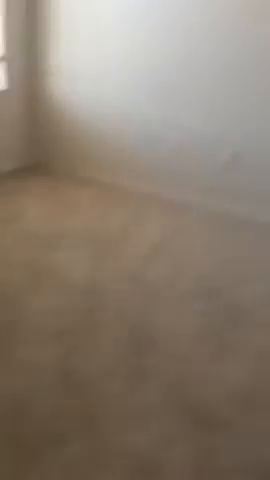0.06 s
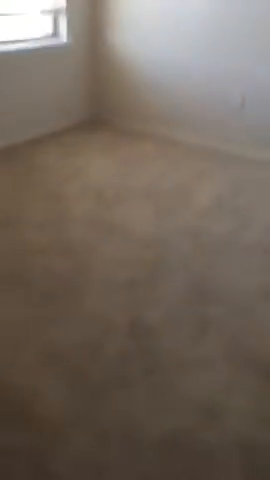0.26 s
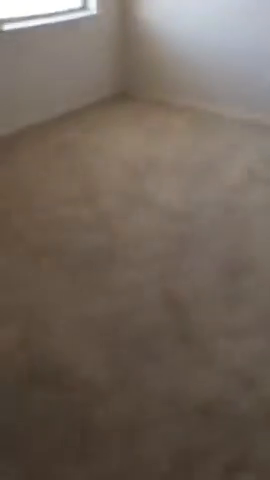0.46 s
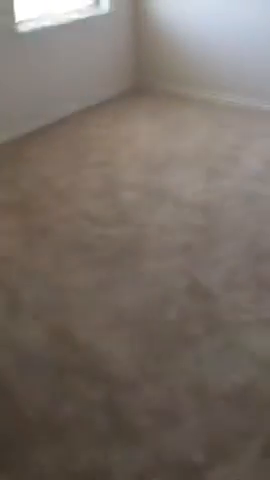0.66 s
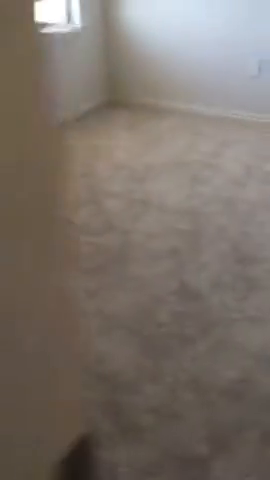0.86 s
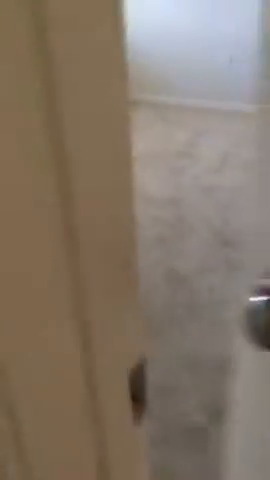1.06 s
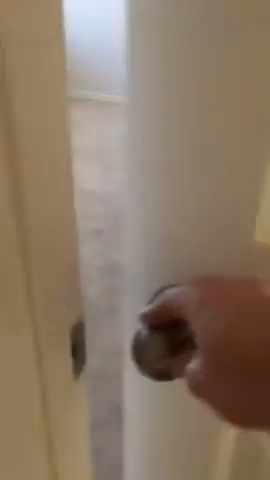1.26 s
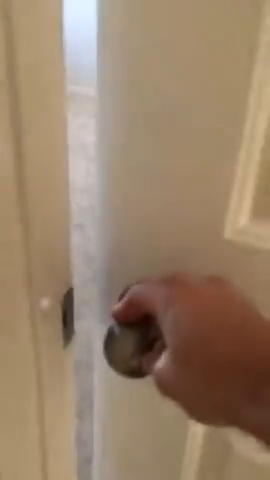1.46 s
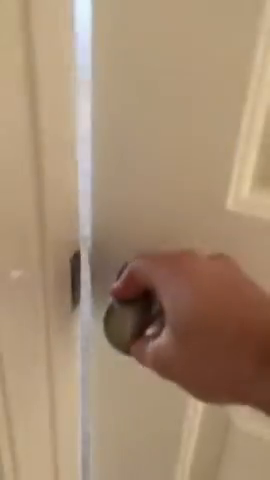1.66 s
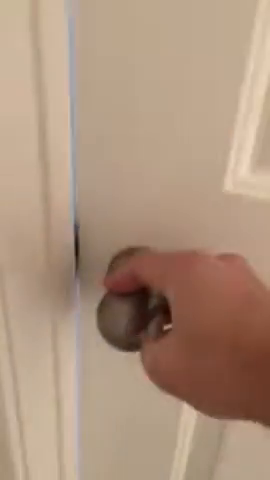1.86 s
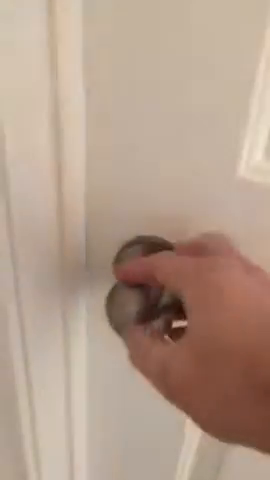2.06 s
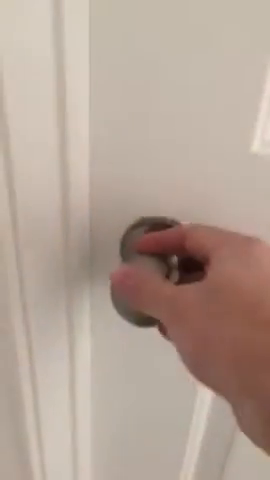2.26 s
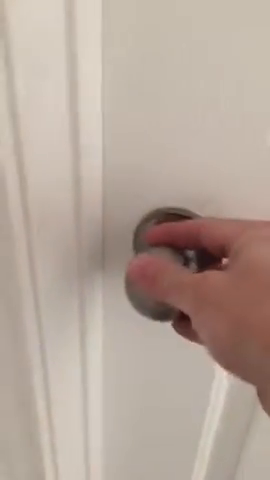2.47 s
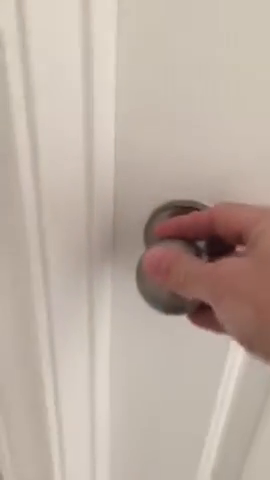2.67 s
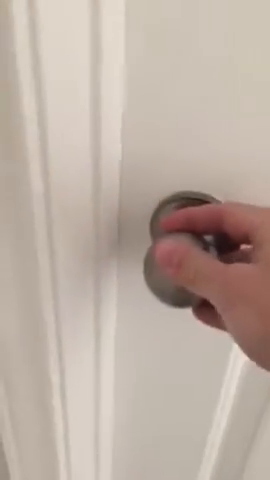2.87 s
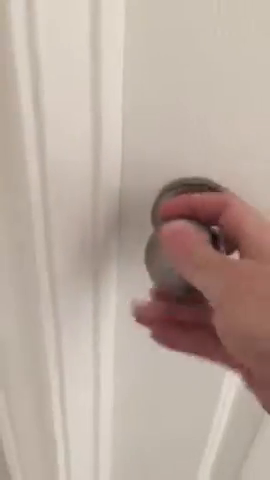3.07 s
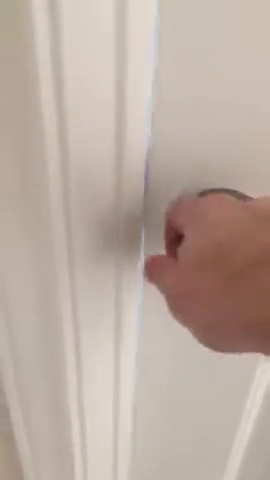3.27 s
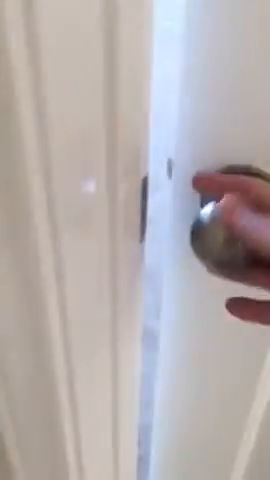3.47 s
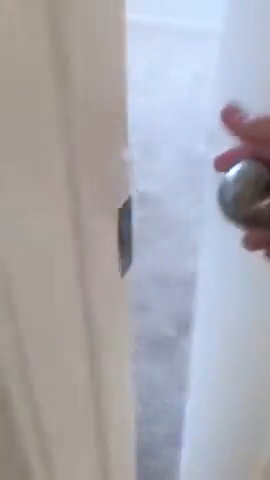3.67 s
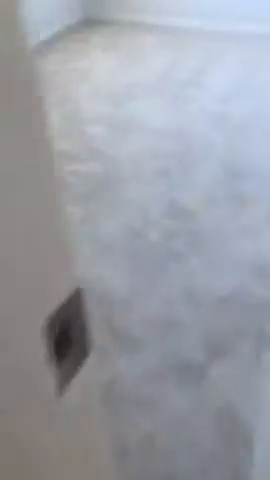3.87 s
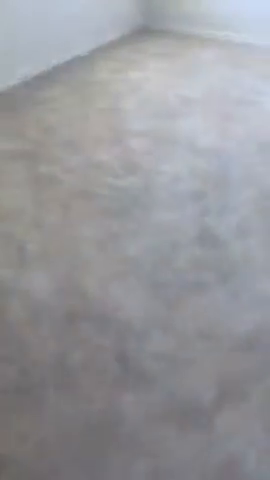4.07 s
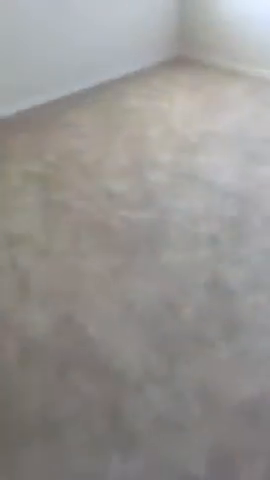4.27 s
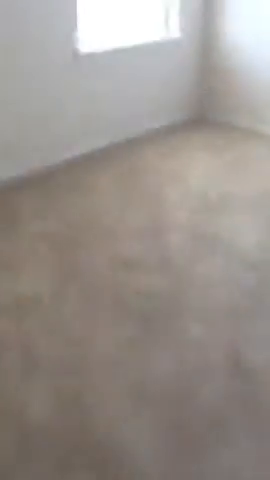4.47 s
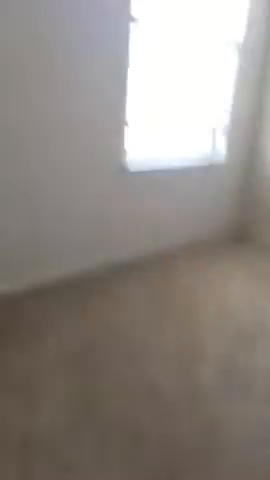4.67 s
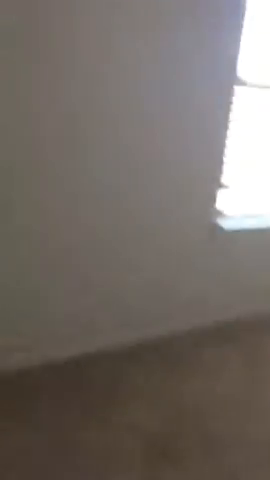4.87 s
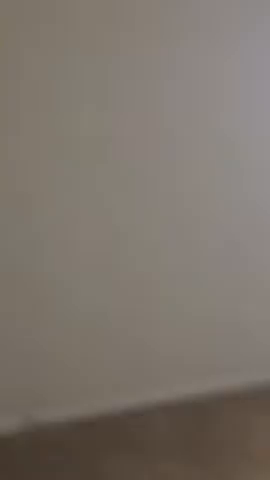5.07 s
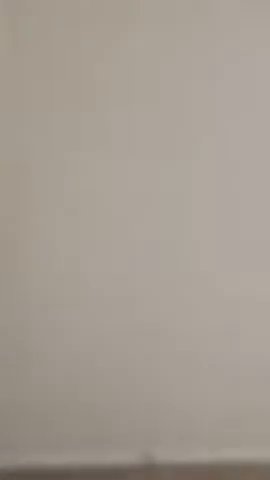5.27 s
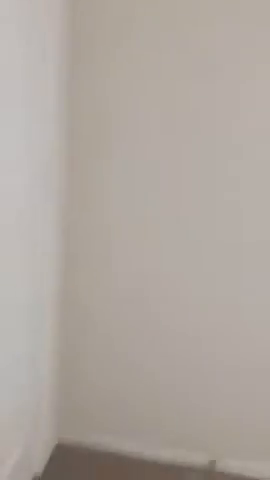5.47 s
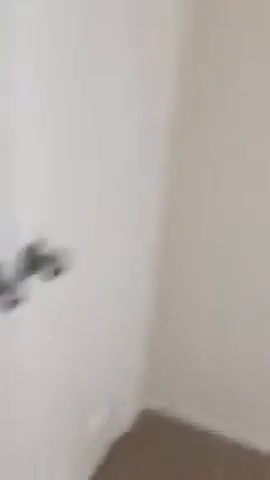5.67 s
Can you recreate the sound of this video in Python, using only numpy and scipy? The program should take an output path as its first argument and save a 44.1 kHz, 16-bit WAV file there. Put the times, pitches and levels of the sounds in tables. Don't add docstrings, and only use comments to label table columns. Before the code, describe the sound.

In an empty echoing room, a light door slams shut over carpet, the loose knob clatters, and the latch clicks free amid soft footsteps.

```python
import sys
import numpy as np
from scipy import signal
from scipy.fft import rfft, irfft
from scipy.io import wavfile
from scipy.ndimage import uniform_filter1d

SR = 44100
rng = np.random.default_rng(int(sys.argv[2]) if len(sys.argv) > 2 else 0)


def wav_out(sig):
    wavfile.write(sys.argv[1], SR, np.round(np.clip(np.atleast_2d(sig).T, -1, 1) * 32767).astype(np.int16))


def invert_db(x):
    u = np.asarray(x, float) / 20
    return 10 ** u


N = 252252
T = np.arange(N) / SR

# (pitch [Hz], level [dB])
LATCH = [(1450, -4.5), (1780, -2), (2000, -1), (2400, -2), (2750, -5.5), (3100, -7), (3700, -3.5),
         (3900, -5), (4500, -10)]
# (pitch [Hz], level [dB], time to fade 60 dB [s])
DOOR = [(62, 0, 0.34), (86, -6, 0.17), (104.6, -4.5, .4), (133, -11, 0.11), (168, 4.5, .3),
        (211.3, -0.5, 0.47), (283.3, 4, 0.26), (338, -1.5, 0.27), (367, -4.5, 0.39), (426, -9, 0.56),
        (488.5, -5, 0.19)]
# (pitch [Hz], level [dB], time to fade 60 dB [s])
SKIN = [(562, -3, 0.25), (616, 0.5, 0.26), (652.6, -6, 0.27), (700.2, -2, 0.21), (799.7, 2.5, 0.16),
        (835, -1, 0.16), (887, 0, 0.22), (986, 1, .1), (1089, -2.5, 0.29), (1244, 0, 0.099),
        (1295, -7, 0.09), (1450, -19.5, 0.16), (1660, -19, 0.11), (1870, -14.5, 0.11)]


def colour(x, points):
    hz, db = np.transpose(points)
    f = np.maximum(np.arange(len(x) // 2 + 1) * SR / len(x), 1)
    gain_db = np.interp(np.log(f), np.log(hz), db)
    return irfft(rfft(x) * invert_db(gain_db), len(x))


def unit(x):
    return x / np.sqrt(np.mean(x ** 2))


def ring(hz, db, t60, seconds, sign=1):
    t = T[:int(seconds * SR), None]
    fade = 1000. ** (-t / np.maximum(t60, .002))
    return np.sum(sign * invert_db(db) * np.sin(2 * np.pi * hz * t) * fade, axis=1)


def add(out, s, x, db):
    i = int(s * SR)
    out[i:i + len(x)] += (x * invert_db(db) / np.abs(x).max())[:N - i]


def track(spans, column, edge=.012):
    value, gate = np.zeros(N), np.zeros(N)
    for rows in map(np.array, spans):
        first_s, last_s = rows[0, 0], rows[-1, 0]
        near = (T > first_s - edge) & (T < last_s + edge)
        value[near] = np.interp(T[near], rows[:, 0], rows[:, column])
        gate[(T > first_s) & (T < last_s)] = 1
    return value, uniform_filter1d(gate, int(edge * SR))


def walk(rate):
    k = int(SR / rate)
    held = np.repeat(rng.standard_normal(N // k + 1), k)
    return uniform_filter1d(held, k)[:N]


def each(groups):
    return [(*row, *traits) for rows, *traits in groups for row in rows]


def swell(s, db, build_s, fade_s, roundness):
    away = np.where(T < s, (s - T) / max(build_s, .001), (T - s) / max(fade_s, .001))
    return invert_db(db - 30 * np.minimum(away, 4) ** roundness)


def slips(per_second, scatter_db, hiss):
    clicks = (rng.random(N) < per_second / SR) * invert_db(scatter_db * rng.exponential(size=N))
    clicks = clicks * rng.choice([-1, 1], N)
    return clicks + hiss * rng.standard_normal(N) * np.std(clicks)


def through(x, modes, t60):
    sides = (-1) ** np.arange(len(modes))
    hz, db = np.transpose(modes)
    return unit(signal.fftconvolve(x, ring(hz, db, t60, .12, sides))[:N])


def house():
    # (pitch [Hz], level [dB per Hz])
    hiss_tone = [(15, -58), (25, -9), (43, 0.5), (166, -1), (195, -2), (223, -2.5), (277, -7), (591, -12),
                 (818, -14), (2110, -14.5), (16000, -28.5)]
    # (time [s], pitch [Hz], level [dB], level of the tone an octave up [dB])
    hum = [(0.4, 105.2, -66, -67.5), (1.062, 106.7, -68.5, -69), (1.66, 111.9, -73, -64),
           (1.7, 103, -57, -95), (1.88, 109, -77, -105)]
    hz, gate = track([hum], 1, edge=0.085)
    db, _ = track([hum], 2, edge=0.085)
    second_db, _ = track([hum], 3, edge=0.085)
    phase = 2 * np.pi * np.cumsum(hz) / SR
    motor = invert_db(db + 1.0 * walk(4)) * np.sin(phase)
    motor = motor + invert_db(second_db + 1.5 * walk(8)) * np.sin(2 * phase)
    air = unit(colour(rng.standard_normal(N), hiss_tone)) * invert_db(-66.5 + .9 * walk(2.5))
    return air + np.sqrt(2) * gate * motor


def ticks():
    # (time [s], peak level [dB], pitch [Hz])
    bolt_tip = [(0.0972, -48.5, 1290), (1.9247, -8, 2940), (3.2086, -45.5, 1400), (3.4441, -52, 2100),
                (3.4683, -49, 3870), (3.2947, -12, 3770)]
    bolt_side = [(2.0742, -22, 1991), (2.0934, 1, 3800), (2.1874, -28, 2240), (2.755, -47, 1450),
                 (3.2505, -37, 1326), (3.281, -19, 2100), (3.5822, -22, 1380), (3.5638, -18, 2100)]
    spring = [(0.1321, -45, 2680), (2.7472, -33, 2500)]
    catch = [(1.3, -25, 1940), (3.0286, -30.5, 1670), (3.1005, -39, 1300), (3, -51, 1794)]
    knob = [(0.0468, -47.5, 1660), (0.7652, -55, 1530), (0.9652, -49, 1650), (1.6906, -50.5, 1300),
            (2.613, -34, 1800), (2.9033, -42.5, 1870), (3.263, -33.5, 1500), (2.9183, -30.5, 2250),
            (2.9991, -43.5, 2260), (3.3444, -27, 2370), (3.4871, -34, 2100), (3.9769, -41.5, 1740),
            (4.0098, -40, 2900), (3.228, -51, 1930), (3.273, -33.5, 1230), (3.59, -25, 1353),
            (3.598, -35.5, 1370)]
    collar = [(0.3436, -48.5, 2620), (2.0857, -9, 1900), (2.1556, -14.5, 2268), (2.2443, -32.5, 1350),
              (2.401, -35, 2500), (2.7202, -40, 2290), (2.7379, -25, 1870), (2.7944, -59, 1430),
              (2.6584, -30, 2060), (2.8799, -52, 1600), (3.5404, -47, 2030)]
    # (pitch [Hz], level [dB])
    bright = [(5650, -2), (6300, 7), (6900, -3), (7700, -7), (9200, -6.5), (10000, -8), (11800, 0),
              (14500, -3), (15600, 2)]
    # (contacts, treble [dB], time to fade 60 dB [s])
    parts = [(bolt_tip, -4, .009), (bolt_side, -8, .01), (spring, -8, .035),
             (catch, -17, .016), (knob, -21, .045), (collar, -27, .028)]
    out, (hz, db) = np.zeros(N), np.transpose(LATCH)
    top_hz, top_db = np.transpose(bright)
    t = T[:2000]
    for s, peak_db, centre_hz, treble_db, t60 in each(parts):
        chance = rng.standard_normal((6, len(hz)))
        near_db = -14 * np.abs(np.log2(hz / centre_hz))
        body_hz, body_db = hz * (1 + 0.047 * chance[0]), db + near_db + 3 * chance[1]
        body = ring(body_hz, body_db, t60, .1, np.sign(chance[5]))
        body = body + ring(centre_hz, -1.0, .8 * t60, .1)
        tilt_db = (0.24 * treble_db - 8.5) * np.log2(top_hz / top_hz[0])
        bright_hz, bright_db = top_hz * (1 + .02 * chance[2]), top_db + tilt_db + 2 * chance[3]
        top = ring(bright_hz, bright_db, .25 * t60, .1, np.sign(chance[4]))
        shudder = np.exp(-t / 0.0045) + .27 * np.exp(-t / (0.8 * t60))
        grit = colour(rng.standard_normal(2000), [(400, -34.0), (1200, 5.0), (3500, -3.5), (6000, treble_db),
                                                  (16000, 1.1 * treble_db - 9.0)])
        add(out, s, body, peak_db)
        add(out, s, top, peak_db + treble_db)
        add(out, s, grit * shudder, peak_db - 6.0)
    return out


def knocks():
    # (time [s], peak level [dB], contact time [ms])
    grab = [(0.047, -47.5, 0.11), (0.0975, -24, 0.17), (0.103, -24.5, 0.46), (0.113, -22.5, 0.27),
            (0.128, -27, 0.24), (0.17, -32.5, 0.25), (0.15, -34, 0.19), (0.19, -31, 0.4), (0.21, -36, 0.19),
            (0.25, -36.5, 0.4), (0.28, -44.5, 0.32), (0.767, -60.5, 0.093), (0.966, -51.5, 0.058),
            (1.082, -50, 0.07), (1.117, -44.5, 0.11), (1.14, -48.5, 0.067), (1.315, -49.5, 0.088),
            (1.692, -48.5, 0.087), (1.71, -56, 0.12)]
    slam = [(1.9255, -13.5, 0.33), (2.086, 0.5, 0.48), (2.093, 1, 0.14), (2.103, -7.5, 0.67),
            (2.116, -6.5, 0.67)]
    rebound = [(2.157, -5.5, 0.043), (2.164, -17.5, 0.094), (2.184, -10.5, 0.051), (2.198, -20, 0.15),
               (2.213, -12.5, 0.41), (2.245, -16, 0.077), (2.272, -23.5, 0.088), (2.31, -21.5, 0.22),
               (2.33, -23.5, 0.34), (2.376, -26.5, 0.081), (2.411, -25, 0.24), (2.445, -27, 0.26),
               (3.031, -25, 0.48)]
    rattle = [(2.385, -27.5, 0.5), (2.614, -26, 0.15), (2.6595, -9.5, 0.3), (2.722, -17, 0.35),
              (2.751, -24.5, 0.64), (2.9395, -12, 0.32), (2.999, -15, 0.37), (3.012, -19.5, 0.66),
              (2.968, -24.5, 0.27), (2.738, -19, 0.55), (2.8, -26.5, 0.97), (3.1, -30, 0.37)]
    turn = [(2.915, -27, 0.23), (3.209, -25.5, 0.19), (3.264, -26, 0.26), (3.293, -32, 0.11),
            (3.343, -25, 0.23), (3.488, -27, 0.5), (3.561, -25.5, 0.56), (3.582, -29, 0.16),
            (3.594, -33.5, .2), (3.283, -34, 0.27), (3.383, -26, 0.6), (3.318, -35, .9), (3.978, -30, 0.33),
            (4.007, -25.5, 0.35), (4.045, -31.5, 0.45), (4.09, -38.5, .4)]
    far = [(4.935, -47.5, 0.5), (5.697, -43.5, 0.21), (5.708, -39, 0.146)]
    # (blows, share of the free ring [0-1], bass [dB], bass below [Hz])
    gestures = [(grab, 0.35, -17.5, 237), (slam, 0.41, -2, 190), (rebound, 0.37, 4.8, 150),
                (rattle, 0.42, 1.2, 89), (turn, 0.54, -24.5, 145), (far, 0.99, -23, 200)]
    out, (hz, db, t60) = np.zeros(N), np.transpose(DOOR + SKIN)
    sides = np.where(hz < 520, np.sign(hz - 118), (-1) ** np.arange(len(hz)))
    for s, peak_db, contact_ms, share, bass_db, bass_hz in each(gestures):
        chance = rng.standard_normal((2, len(hz)))
        bass = bass_db / (1 + (hz / bass_hz) ** 4)
        hz_now, db_now = hz * (1 + .008 * chance[0]), db + bass + 2.5 * chance[1]
        panel = ring(hz_now, db_now, t60 * share, 0.51, sides)
        push = T[:400] * np.exp(-T[:400] * 1000 / max(contact_ms, .03))
        add(out, s, signal.fftconvolve(panel, push), peak_db + 0.5)
    return out


def steps():
    # (time [s], peak level [dB], pitch [Hz], time to fade 60 dB [s])
    thuds_and_creaks = [(0.084, -39.5, 91, 0.12), (0.222, -33.5, 74, 0.12), (0.3, -40, 70, 0.056),
                        (0.365, -50, 87, 0.14), (1.078, -58, 595, .09), (1.098, -48, 630, 0.11),
                        (1.117, -54, 570, 0.13), (1.312, -59, 690, .1), (1.111, -45, 125.3, 0.19),
                        (1.135, -50, 118, 0.16), (1.242, -50.5, 155, 0.082), (1.283, -64, 140, 0.087),
                        (1.325, -53, 149, 0.069), (1.4, -58, 100, .07), (2.472, -37, 111, .1),
                        (2.51, -30.5, 95, 0.13), (3.448, -34.5, 143, 0.19), (3.649, -39, 133, 0.066),
                        (3.845, -40, 53.8, 0.22), (3.94, -39.5, 112, 0.078), (4.062, -33, 99.4, 0.25),
                        (4.078, -31, 63.2, 0.56), (4.093, -43.5, 293, 0.042), (4.137, -24, 128, 0.058),
                        (4.151, -44, 105, 0.092), (4.182, -35.5, 62, 0.16), (4.213, -32, 74, 0.049),
                        (4.247, -51, 51.8, 0.1), (4.301, -32, 63, 0.073), (4.329, -38, 69.2, 0.079),
                        (4.427, -37.5, 61, 0.14), (4.497, -54.5, 79.6, 0.1), (4.863, -48.5, 72.4, 0.12),
                        (4.936, -50, 142, 0.092), (5.379, -45.5, 60.5, 0.13), (5.449, -49.5, 48.6, 0.097),
                        (5.488, -55.5, 52, 0.11)]
    out = np.zeros(N)
    for s, peak_db, hz, t60 in thuds_and_creaks:
        tones_db = np.array([-8, 0, -9]) + 3.1 * rng.standard_normal(3)
        floor = ring(hz * np.array([.62, 1, 1.7]), tones_db, t60, 0.53)
        soft_start = 1 - np.exp(-T[:len(floor)] / 0.002)
        add(out, s, floor * soft_start, peak_db + 4.5)
    return out


def sleeve():
    # (loudest time [s], level [dB], build [s], fade [s])
    rubs = [(0.35, -78, 0.14, 0.17), (2.385, -70, .05, 0.041), (3.66, -74, 0.12, 0.41),
            (3.989, -63.5, 0.13, 0.11), (4.13, -70, 0.079, 0.11), (4.3, -68, 0.13, 0.12)]
    cloth = unit(colour(slips(6000., 1.9, 1.0), [(5000, -32), (9000, -5), (13000, 0), (16000, -3.5)]))
    cloth = cloth * invert_db(2.0 * walk(60))
    return cloth * sum(swell(*rub, 2.7) for rub in rubs)


def brush():
    # (loudest time [s], level [dB], build [s], fade [s], treble [dB])
    strokes = [(0.37, -68, 0.086, 0.03, -13), (1.105, -55, 0.09, 0.26, -10), (1.249, -52, 0.11, 0.18, -7.5),
               (1.34, -52, 0.19, 0.11, -15), (1.395, -67.5, .1, 0.02, -22),
               (3.645, -63.5, 0.044, 0.12, -17.5), (3.95, -67, 0.24, 0.13, -4),
               (4.07, -64, 0.14, 0.27, -5.5), (4.299, -69.5, 0.086, 0.14, 1.5),
               (4.909, -67.5, 0.22, 0.14, -15), (5.481, -67, 0.2955, 0.79, -8.5),
               (4.71, -68.5, 0.08, 0.068, -20)]
    # (pitch [Hz], level [dB per Hz])
    pile_tone = [(53, -44), (90, -17), (151, 4.5), (311, -15.5), (640, -10), (698, -12), (984, -13),
                 (2250, -9), (5500, -20), (7150, -39), (12100, -120)]
    body = unit(colour(slips(4000., 2.0, 1.2), pile_tone)) * invert_db(1.8 * walk(120))
    top_tone = [(3500, -30), (5200, 0), (8000, -5), (10500, -12), (16000, -14)]
    top = unit(colour(rng.standard_normal(N), top_tone)) * invert_db(2.0 * walk(40))
    flat = unit(colour(body, [(800, -17), (1550, 0.5), (2400, -14.0)]))
    out = 0
    for s, db, build_s, fade_s, treble_db in strokes:
        out = out + swell(s, db, build_s, fade_s, 1.4) * (body + invert_db(treble_db) * top)
        out = out + swell(s + 0.31 * fade_s, db - 13.0, 0.48 * build_s, 0.4 * fade_s, 1.1) * flat
    return out


def chatter():
    # (loudest time [s], level [dB], build [s], fade [s], treble [dB])
    bursts = [(1.927, -31, 0.002, 0.076, -14), (2.0845, -19, .002, 0.076, -15),
              (2.156, -30.5, 0.0033, 0.053, -21), (2.406, -49, 0.15, 0.11, -18.5),
              (2.629, -44.5, 0.075, 0.078, -16.5), (2.747, -36, 0.014, 0.049, -22),
              (2.77, -46, .05, .15, -25), (3.029, -42, .003, .07, -20), (2.92, -44.5, 0.053, 0.118, -15),
              (3.206, -40.5, 0.0026, 0.065, -31), (3.29, -30.5, 0.064, 0.0033, -23.5),
              (3.296, -32, 0.0021, 0.038, -2), (3.348, -41, 0.012, 0.052, -19.5),
              (3.37, -48, 0.07, 0.012, -25), (3.485, -42.5, 0.0026, 0.045, -12.5),
              (3.23, -44, .04, .1, -22), (3.39, -52, .03, .4, -22), (3.545, -46, .1, .05, -22),
              (3.605, -44, .03, .2, -22), (3.563, -41.5, 0.063, 0.007, -9.5),
              (3.568, -33.5, 0.0025, 0.049, -27), (3.583, -29.5, 0.0072, 0.054, -13),
              (4.016, -45.5, 0.077, 0.044, -11), (4.04, -55, .03, .3, -18)]
    force = slips(1800., 1.8, 1.0) * invert_db(2.5 * walk(250))
    wood = through(force, np.array(DOOR + SKIN)[6:, :2], 0.014)
    metal = unit(colour(through(force, LATCH, .006), [(2400, 0), (3200, -4), (4800, -11)]))
    fizz = unit(colour(force, [(2800, -18), (4600, 0), (7000, -3), (10000, -10), (16000, -15)]))
    wood_db, wood_linger = -2, 1.4
    out = 0
    for s, db, build_s, fade_s, treble_db in bursts:
        out = out + swell(s, db - 2.0, build_s, fade_s, 0.85) * (metal + invert_db(treble_db) * fizz)
        out = out + swell(s, db + wood_db, build_s, fade_s * wood_linger, 0.95) * wood
    return out


def slide():
    # (time [s], level [dB], free-end pitch [Hz], free-end level [dB])
    drag = [(1.955, -54.5, 4830, -16), (1.988, -48, 4950, -19.5), (2.0, -39, 5235, -17.5),
            (2.022, -34.5, 5654, -12), (2.045, -35, 6300, -15.5), (2.07, -41, 6350, -25.5),
            (2.083, -25, 6675, -26.5)]
    # (pitch [Hz], level [dB])
    plate = [(1640, -7.5), (1830, -1.5), (1910, 4.5), (1990, 2), (2180, -5), (2370, -9.5), (3100, -10.5),
             (3500, -10.5), (3720, -10), (3950, -11.5), (4400, -14.5)]
    force = slips(5000., 2.2, 0.7) * invert_db(2.2 * walk(300))
    db, gate = track([drag], 1, edge=0.00093)
    hz, _ = track([drag], 2, edge=0.00093)
    end_db, _ = track([drag], 3, edge=0.00093)
    phase = 2 * np.pi * np.cumsum(hz) / SR
    end = unit(walk(1300)) * (np.sin(phase) + .7 * np.sin(.63 * phase))
    end = end + invert_db(-5) * unit(walk(2500)) * (np.sin(1.27 * phase) + .7 * np.sin(1.48 * phase))
    rasp = unit(colour(force, [(300, -19.5), (900, -5), (2000, -0.5), (4800, -5.5), (7000, -10.5),
                               (11000, -23), (16000, -34)]))
    return gate * invert_db(db) * (through(force, plate, .014) + invert_db(end_db - 3) * end + invert_db(-8) * rasp)


def squeak():
    # (start [s], length [s], first pitch [Hz], last pitch [Hz], level [dB])
    whistles = [(2.365, .035, 11600, 11645, -69), (2.362, .035, 9855, 9925, -72),
                (2.71, .04, 11200, 11200, -75), (2.93, .06, 12300, 12700, -78),
                (3.01, .075, 11800, 11150, -77), (3.075, .065, 11200, 11350, -77),
                (3.258, .028, 5160, 5180, -52), (5.25, .12, 12200, 13800, -83),
                (5.365, .028, 13700, 12200, -86), (5.45, .085, 14500, 12000, -82),
                (2.95, .045, 11750, 11450, -81), (2.765, .035, 9400, 8600, -79)]
    out, waver, flicker = np.zeros(N), walk(200), walk(68)
    for s, length_s, first_hz, last_hz, db in whistles:
        along = np.clip((T - s) / length_s, 0, 1)
        hz = first_hz + (last_hz - first_hz) * along
        phase = 2 * np.pi * np.cumsum(hz * (1 + 0.006 * waver)) / SR
        out += np.sin(np.pi * along) * invert_db(db + 4.0 + 3.5 * flicker) * np.sin(phase)
    return out


def bell():
    # (pitch [Hz], level [dB], time to fade 60 dB [s])
    knob_tones = [(709, -6.5, 0.17), (1104, -10, 0.12), (1430, -0.5, 0.043), (1770, 1, 0.065),
                  (2920, -6, 0.048), (3770, -30, 0.14)]
    # (time [s], peak level [dB])
    hits = [
        (3.979, -38.5),
        (3.989, -38),
        (4.008, -24),
        (4.034, -49),
    ]
    out, (hz, db, t60) = np.zeros(N), np.transpose(knob_tones)
    for s, peak_db in hits:
        add(out, s, ring(hz, db + 2.0 * rng.standard_normal(len(hz)), t60, .2), peak_db)
    return out


def room(x):
    # (band centre [Hz], level [dB], time to fade 60 dB [s])
    bands = [(70, 2.5, 0.84), (204.6, -5.5, 0.45), (650, -7, 0.37), (1600, -19, 1), (3800, -16, 0.12),
             (9000, -24.5, 0.13)]
    t, tail = T[:SR], 0
    for hz, db, t60 in bands:
        shape = [(hz / 4, -36), (hz / 1.6, -5), (hz, 0), (hz * 1.6, -5), (hz * 4, -36)]
        band = colour(rng.standard_normal(SR), shape)
        tail = tail + invert_db(db) * band * 1000. ** (-t / t60) / np.sqrt(t60 * SR / 14)
    return signal.fftconvolve(x, tail * (1 - np.exp(-t / 0.0015)))[:N]


def scene():
    near = ticks() + knocks() + chatter() + slide() + brush() + squeak() + sleeve() + bell()
    thumps = steps()
    echo = room(near + invert_db(-13.5) * thumps)
    return (near + thumps + echo + house())[None]


def band_limit(x):
    return signal.sosfilt(signal.butter(12, 17140, fs=SR, output="sos"), x)


def record(dry):
    x = signal.sosfilt(signal.butter(3, 42, "highpass", fs=SR, output="sos"), dry)
    x = np.tanh(1.196 * x) / 1.329
    x = signal.sosfilt(signal.ellip(4, .3, 13, 15850, fs=SR, output="sos"), x)
    return band_limit(x)


dry = scene()
out = record(dry)
wav_out(out)
```